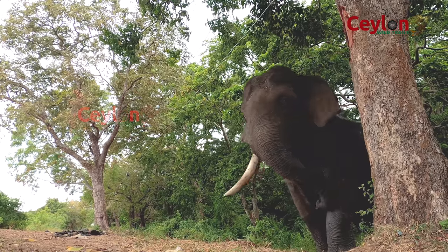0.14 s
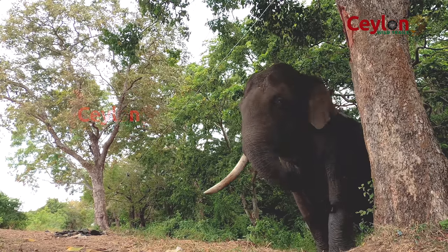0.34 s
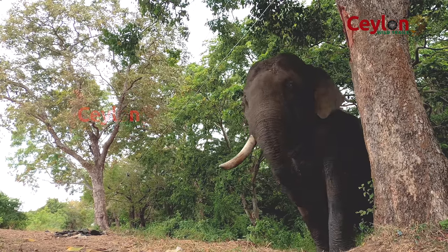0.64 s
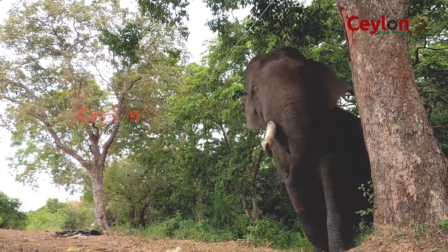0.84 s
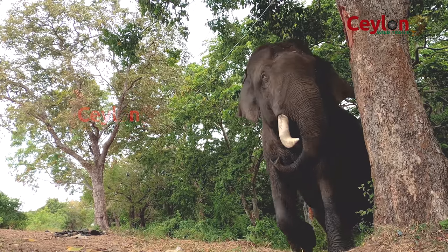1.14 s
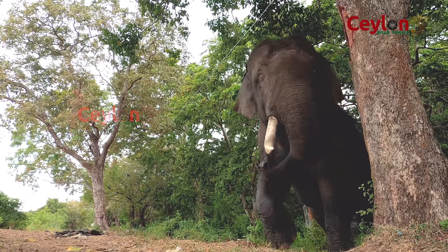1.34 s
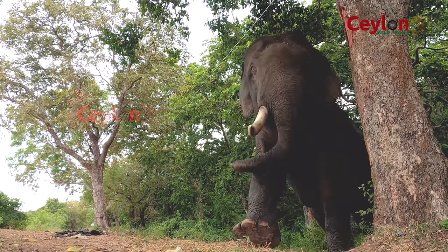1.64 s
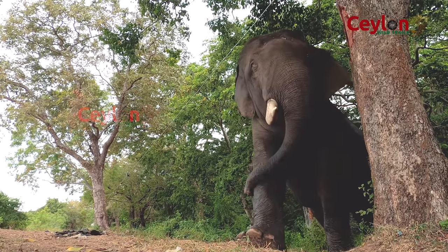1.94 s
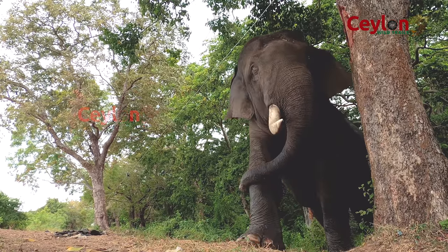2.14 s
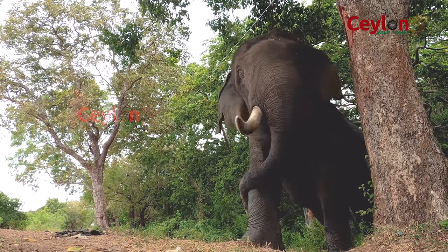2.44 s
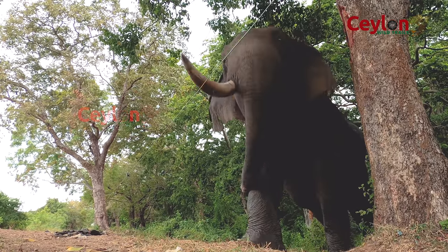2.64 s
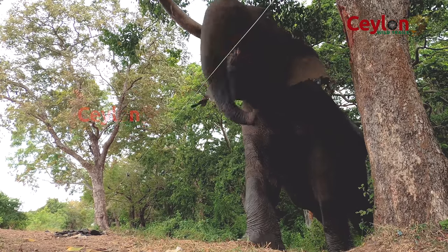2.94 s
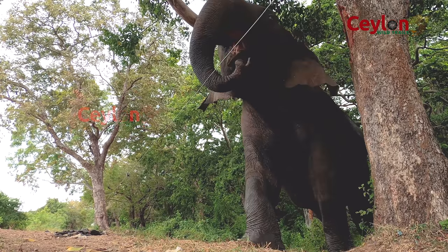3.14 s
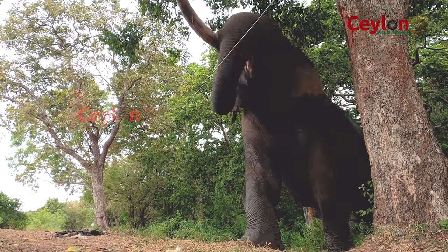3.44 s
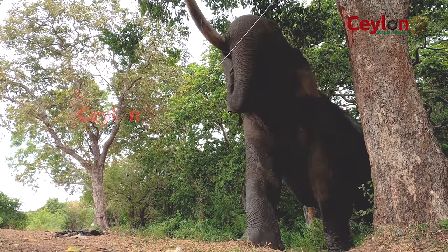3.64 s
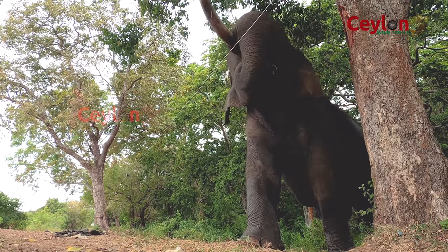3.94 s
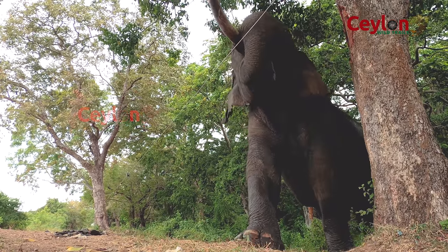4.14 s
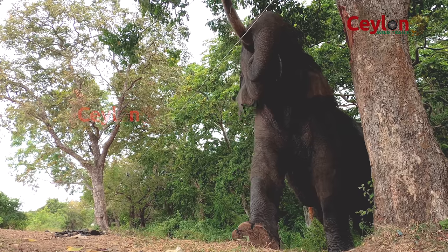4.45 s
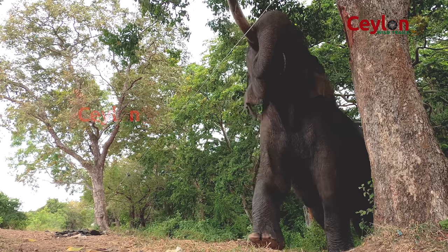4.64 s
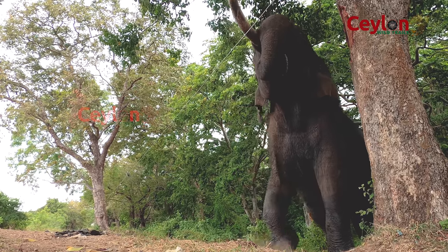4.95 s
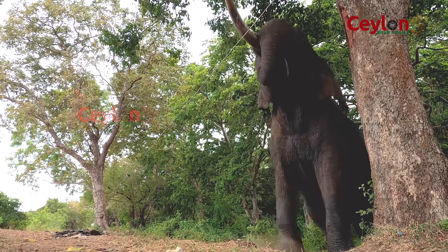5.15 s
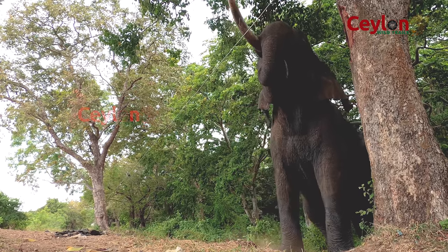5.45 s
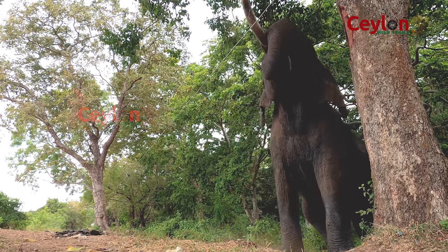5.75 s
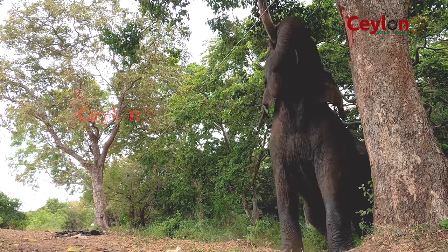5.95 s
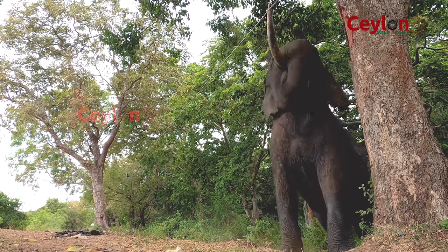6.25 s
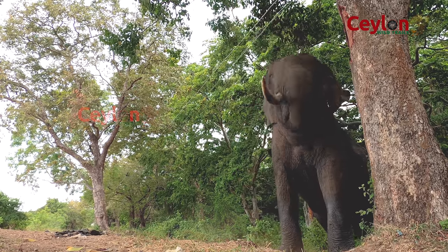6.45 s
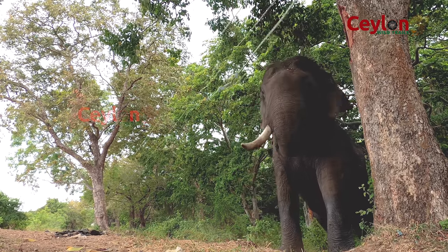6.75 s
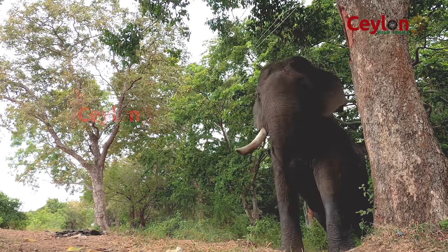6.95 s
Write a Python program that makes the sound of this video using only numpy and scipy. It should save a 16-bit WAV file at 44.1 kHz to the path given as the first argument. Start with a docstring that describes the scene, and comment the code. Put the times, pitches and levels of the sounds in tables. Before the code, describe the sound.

Faint bird chirps, a quick trill and three short whistles sound among trees over low gusts on the microphone. Nearby, an elephant's steel chain clanks in two short bursts and drags softly. The animal's feet crush dry soil and leaves, with dull snaps and a thud. The chain then breaks into hard, bright jingling, the loudest sound, lasting to the end. The outdoor sound comes from the left side only.

```python
"""Chained elephant at a forest edge.

An elephant shifts its feet and stretches up into a tree, crushing dry soil, clods and leaves.
A steel chain, probably on its leg, clinks, drags, then jingles hard as its links collide, ring and scrape.
Birds trill and whistle among the trees. Air rumbles on a microphone that feeds the left channel only."""
import sys
import numpy as np
from scipy import signal
from scipy.io import wavfile
from scipy.ndimage import uniform_filter1d

SR = 44100
rng = np.random.default_rng(int(sys.argv[2]) if len(sys.argv) > 2 else 0)


def put_to_file(sound):
    """Save the sound as 16-bit audio at rate SR, in the file named by the first command-line argument."""
    columns = np.atleast_2d(sound).T  # one column per channel
    safe = np.clip(columns, -1, 1)
    whole_steps = np.round(safe * 32767)
    wavfile.write(sys.argv[1], SR, whole_steps.astype(np.int16))


N = 313551
TIME_S = np.arange(N) / SR
CONTACT_S = 0.0007  # time constant of a link's attack

# Spectra of forest air, microphone rumble and a strong buffet's upper part.
# Each row: frequency in Hz, relative gain in dB.
AIR_SPECTRUM = [(59, -30.5), (100, -14), (128, -4), (299, -10), (684, -24.5), (1030, -24.5), (2370, -26.5),
                (3970, -24.5), (8000, -39.5), (9800, -37), (10900, -72)]
RUMBLE_SPECTRUM = [(10, -13.5), (25, -1), (42, 0), (70, 2.5), (95, -6), (125, -22), (170, -38), (300, -41),
                   (800, -78)]
GUST_SPECTRUM = [(50, -44), (100, 18.5), (135, 4), (190, -15), (600, -87)]
# Forest air, and the breeze between buffets. Each row: time in seconds, level in dB.
AIR_LEVELS = [(0, -56), (2.6, -57), (3.5, -55), (4.27, -58), (4.6, -49), (5.0, -56), (5.8, -53.5),
              (6.3, -58.5)]
BREEZE_LEVELS = [(0, -43), (1.4, -52), (3.7, -48.5), (5.4, -55), (6.2, -62.5), (7.1, -60)]
# Air hitting the microphone. Each row: peak time and half length in seconds, level in dB.
MIC_BUFFETS = [(0.64, 0.12, -34), (0.85, 0.074, -33), (1.146, 0.15, -29.5), (1.642, 0.12, -34),
               (1.936, 0.063, -33.5), (2.1, 0.073, -38), (2.472, 0.16, -36), (3.143, 0.024, -36),
               (3.604, 0.066, -38.5), (4.846, 0.044, -40.5), (5.002, 0.066, -44), (6.034, 0.012, -32.5),
               (6.92, 0.12, -45)]
# Distant birds. Each row: start and length in seconds, level in dB, start and end pitch in Hz.
FAR_CHIRPS = [(0.332, .07, -50, 3900, 5470), (0.388, 0.076, -49.5, 5310, 3960),
              (0.445, 0.093, -50, 2910, 3640), (0.773, 0.044, -48, 2780, 3860),
              (0.822, 0.071, -47, 4270, 5480), (3.634, 0.048, -49, 3750, 3130),
              (3.905, 0.061, -47.5, 4000, 3090), (4.044, 0.046, -42.5, 4450, 4980),
              (4.209, 0.12, -47.5, 3870, 2620), (4.824, 0.084, -49, 3920, 3100),
              (5.552, 0.084, -46, 3420, 4400), (5.694, 0.066, -46, 3250, 4280),
              (5.833, 0.071, -44.5, 3450, 4270)]
# Three whistles, each lower than the last.
# Each row: start and length in seconds, level in dB, start, middle and end pitch in Hz.
BIRD_WHISTLES = [(2.152, 0.072, -35, 2550, 2666, 2815), (2.294, 0.083, -39.5, 2440, 2326, 2450),
                 (2.475, 0.063, -35.5, 2100, 2183, 2100)]
# Runs of a trill. Each row: first and last onset in seconds, notes per second, first and last level in dB,
# top pitch in Hz.
TRILL_RUNS = [(1.541, 1.678, 35, -43.5, -36, 3380), (1.725, 1.875, 20, -35.5, -35, 3260),
              (1.972, 2.024, 20, -34.5, -33.5, 3250)]
# Feet on soil. Each row: peak time, rise and fall in seconds, level in dB, band centre in Hz.
SOIL_SCUFFS = [(0.1, .05, 0.12, -61.5, 895), (0.42, 0.038, 0.085, -56.5, 745),
               (0.57, .035, 0.069, -56, 650), (1.77, 0.062, 0.036, -61.5, 540),
               (1.935, 0.024, 0.018, -40, 784), (2.024, 0.0088, 0.022, -51, 940),
               (2.84, 0.065, 0.19, -55.5, 1700), (3.371, 0.0059, 0.036, -53.5, 1550),
               (3.713, 0.011, 0.014, -54, 1990), (4.551, 0.1, 0.039, -46, 950),
               (4.595, 0.045, 0.073, -36.5, 570), (4.685, 0.035, 0.017, -34, 650),
               (4.718, .025, 0.032, -34, 470), (4.715, .05, 0.025, -38.5, 194),
               (4.796, 0.0034, 0.005, -35, 590), (5.184, 0.004, 0.084, -41.5, 2070),
               (5.19, 0.0087, 0.053, -40, 705), (5.2, 0.012, 0.046, -35.5, 216)]
# Dry leaves. Each row: peak time and rise in seconds, level in dB.
LEAF_RUSTLES = [(1.731, 0.072, -49), (2.03, 0.064, -52), (2.47, 0.1, -52.5), (2.69, 0.022, -53),
                (2.826, 0.041, -43.5), (3.054, .012, -45), (4.57, 0.058, -60), (5.935, 0.021, -48)]
# Breaking clods. Each row: time in seconds, peak level in dB, pitch in Hz.
CLOD_CRACKS = [(4.521, -35, 1010), (4.573, -20, 1040), (4.582, -17.5, 1010), (4.615, -20, 1070),
               (4.684, -29, 1360), (4.698, -26, 850), (4.7142, -23.5, 633), (4.794, -27.5, 830),
               (6.183, -37, 584)]
# Heavy steps. Each row: peak time in seconds, level in dB.
FOOT_THUDS = [(5.2, -37), (6.039, -36)]
# Modes of a typical link. Each row: frequency in Hz, relative level in dB, nominal T60 in seconds.
LINK_MODES = [(3250, -14, 0.02), (4720, -3, 0.053), (4818, 5.5, 0.03), (5084, 4, 0.19), (5262, 4.5, 0.14),
              (5560, -1, 0.11), (5960, -2, 0.056), (6160, -4, 0.12), (6370, -7.5, 0.088), (7080, -14, 0.17),
              (7550, -13, 0.12), (8720, -12, 0.12), (9400, -43, 0.029), (11800, -23, .05)]
# Steel scraping steel. Each row: frequency in Hz, relative gain in dB.
SCRAPE_SPECTRUM = [(200, 5.5), (800, -9.5), (1300, 2.5), (2400, 4.5), (3500, 7.5), (6000, 8.5), (9000, 6.5),
                   (10300, 0), (12400, -3), (15000, -15)]
# Strong overtones ringing on from the first two chain clanks.
# Each row: start in seconds, level in dB, pitch in Hz, T60 in seconds.
CLANK_OVERTONES = [(2.862, -47, 3100, 0.23), (2.862, -30, 7950, 0.082), (2.864, -22.5, 4630, 0.07),
                   (2.867, -28.5, 5980, 0.12), (3.126, -26, 6520, .07), (3.126, -39, 7560, 0.29),
                   (3.129, -35, 5010, 0.25)]
# Hard knocks. Each row: start in seconds, peak level in dB, tick-to-ring ratio in dB, main partial in Hz.
CHAIN_CLINKS = [(2.861, -19.5, 0, 5090), (2.868, -19.5, -4.5, 5103), (2.875, -25.5, 3, 5222),
                (3.052, -20.5, -2.5, 4440), (3.074, -24, 15, 5760), (3.085, -18.5, -8, 5060),
                (3.127, -18.5, -11, 4940), (3.157, -26, -11, 5060), (3.349, -37.5, 11, 5130),
                (5.9897, -10, -3.5, 5190), (5.999, -8.5, -15, 4810), (6.0445, -11, -17, 4920),
                (6.0537, -14.5, -6, 5000), (6.069, -22, -20, 4900), (6.119, -18.5, -14, 5130),
                (6.1389, -15, -5.5, 4855), (6.2125, -14.5, -28, 5170), (6.248, -17, -14, 5080),
                (6.2906, -19.5, -1, 5120), (6.366, -17, -14, 5140), (6.3949, -16.5, -10, 5150),
                (6.405, -19, -16, 5250), (6.463, -22.5, 5, 5380), (6.543, -17, -10, 5220),
                (6.602, -22, -1, 5320), (6.642, -22, -10, 5090), (6.77, -18.5, -5, 5160),
                (6.824, -16.5, -6, 6450), (6.907, -26, 6, 4830), (6.925, -17.5, 2, 5020),
                (6.961, -19, 6.5, 5280), (7.0843, -16, -8, 4790)]
# Chain settling, then dragging. Each row: time in seconds, relative ring and scrape levels in dB.
DRAG_LEVELS = [(2.87, -36, -50.5), (3.034, -46.5, -63), (3.055, -26.5, -44), (3.16, -35.5, -50),
               (3.23, -46, -58.5), (4.25, -55.5, -63), (5.971, -49, -65.5)]
# Sways of the trailing chain. Each row: peak time and half length in seconds, ring level in dB.
CHAIN_SWAYS = [(3.32, 0.049, -53), (3.485, 0.088, -57), (3.92, 0.034, -53), (4.715, 0.038, -54),
               (5.68, 0.098, -59.5)]
# Jerks. Each row: peak time and half length in seconds, relative ring and scrape levels in dB.
CHAIN_JERKS = [(6.067, 0.062, -28, -45), (6.16, 0.12, -31.5, -46), (6.392, 0.078, -27, -45.5),
               (6.556, 0.034, -26.5, -42), (6.613, 0.039, -28, -44), (6.709, 0.041, -26.5, -54),
               (6.769, 0.031, -25.5, -40), (6.824, 0.065, -30, -38), (6.929, 0.021, -23, -38.5),
               (6.993, 0.046, -28, -42.5), (7.102, 0.043, -24.5, -42.5)]


def amp(db):
    """Decibels to gain."""
    return 10 ** (np.asarray(db) / 20)


def unit_rms(x):
    """Scales to rms 1."""
    return x / np.sqrt(np.mean(x ** 2) + 1e-20)


def unit_peak(x):
    """Scales to peak 1."""
    return x / (abs(x).max() + 1e-20)


def steady(x, span_s):
    """Evens out the level, keeping flutter faster than span_s."""
    size = max(int(span_s * SR), 8)
    power = uniform_filter1d(uniform_filter1d(x ** 2, size), size)
    return x / np.sqrt(abs(power) + 1e-12)


def low_pass(x, hz, order):
    """Cuts above hz."""
    return signal.sosfilt(signal.butter(order, hz, fs=SR, output="sos"), x)


def high_pass(x, hz, order):
    """Cuts below hz."""
    return signal.sosfilt(signal.butter(order, hz, "high", fs=SR, output="sos"), x)


def colour(x, spectrum):
    """Minimum-phase filter through (Hz, dB) points."""
    hz, db = np.transpose(spectrum)
    grid_hz = abs(np.fft.fftfreq(8192, 1 / SR))
    log_gain = np.log(amp(np.interp(np.log(grid_hz + 1), np.log(hz), db)))
    taps = np.fft.ifft(np.exp(np.conj(signal.hilbert(log_gain)))).real
    return signal.oaconvolve(x, taps[:len(grid_hz) // 2])[:len(x)]


def flutter(n, per_s):
    """Smooth random curve of rms 1."""
    return unit_rms(signal.resample(rng.standard_normal(int(n * per_s / SR) + 2), n))


def grains(n, per_s, spread_db):
    """Random impacts of either sign, sizes scattered by spread_db."""
    size = amp(spread_db * np.minimum(rng.exponential(1, n), 4))
    return size * rng.choice([-1., 1.], n) * (rng.random(n) < per_s / SR)


def swells(t, rows, bed_db):
    """Gain of bell-shaped swells, added in power to a bed."""
    power = sum((amp(db) * np.exp(-((t - peak_s) / half_s) ** 2)) ** 2 for peak_s, half_s, db in rows)
    return np.sqrt(amp(bed_db) ** 2 + power)


def add(mix, start_s, sound):
    """Mixes a sound in at start_s."""
    part = mix[max(round(start_s * SR), 0):][:len(sound)]
    part += sound[:len(part)]


def play(source, rows):
    """Mixes one (start, sound) from source per row."""
    mix = np.zeros(N)
    for row in rows:
        add(mix, *source(*row))
    return mix


def forest_air():
    """Faint, wavering wash of still air."""
    level_db = np.interp(TIME_S, *np.transpose(AIR_LEVELS)) + flutter(N, per_s=15)
    return amp(level_db) * unit_rms(colour(rng.standard_normal(N), AIR_SPECTRUM))


def mic_wind(gust_db=-6):
    """Air buffets the microphone; stronger buffets reach higher in frequency."""
    force = swells(TIME_S, MIC_BUFFETS, np.interp(TIME_S, *np.transpose(BREEZE_LEVELS)))
    rumble = steady(colour(rng.standard_normal(N), RUMBLE_SPECTRUM), span_s=0.035)
    gust = steady(colour(rng.standard_normal(N), GUST_SPECTRUM), span_s=0.063)
    return force * (rumble + amp(gust_db) * (force / force.max()) ** 1.95 * gust)


def forest_echo(x, t60_s):
    """Trunks and leaves scatter a thin tail of echoes."""
    t = TIME_S[:SR]
    tail = grains(SR, per_s=2500, spread_db=2) * amp(-60 * t / t60_s) * (t > 0.006)
    return signal.oaconvolve(x, tail / np.linalg.norm(tail))[:N]


def jitter(n):
    """Fast pitch noise of rms 1, heard as rasp."""
    return unit_rms(uniform_filter1d(rng.standard_normal(n), 24))


def chirp(start_s, length_s, db, start_hz, end_hz):
    """A distant bird's husky, straight slur."""
    return whistle(start_s, length_s, db, start_hz, (start_hz + end_hz) / 2, end_hz, skew=1, rasp=0.052)


def whistle(start_s, length_s, db, start_hz, middle_hz, end_hz, skew=1.5, rasp=0.0031):
    """A bird glides through three pitches; skew above 1 delays the swell."""
    u = np.linspace(0, 1, int(length_s * SR))
    glide_hz = np.polyval(np.polyfit([0, 0.5, 1], [start_hz, middle_hz, end_hz], 2), u)
    hz = glide_hz * (1 + rasp * jitter(len(u)))
    return start_s, amp(db) * np.sin(np.pi * u ** skew) * np.sin(2 * np.pi * np.cumsum(hz) / SR)


def trill_note(start_s, db, top_hz, length_s=0.028):
    """A raspy flick up, a weak top, a stronger slur down."""
    u = np.linspace(0, 1, int(length_s * SR))
    rasp = np.interp(start_s, [1.6, 1.85], [0.115, 0.04])  # clears as the trill slows
    arch = 1 - 0.179 * ((u - 0.42) / 0.57) ** 2
    hz = top_hz * (arch + rasp * jitter(len(u)))
    dip = 1 - 0.85 * np.exp(-((u - 0.38) / 0.24) ** 2)
    envelope = abs(np.sin(np.pi * u)) ** 0.5 * dip
    return start_s, amp(db) * envelope * np.sin(2 * np.pi * np.cumsum(hz) / SR)


def bird_trill(throat_hz=2860):
    """Runs of evenly spaced, growing notes; the throat passes little below throat_hz."""
    notes = []
    for first_s, last_s, per_s, first_db, last_db, top_hz in TRILL_RUNS:
        for u in np.linspace(0, 1, round((last_s - first_s) * per_s) + 1):
            notes.append((first_s + u * (last_s - first_s), first_db + u * (last_db - first_db), top_hz))
    return high_pass(play(trill_note, notes), throat_hz, order=8)


def crush(peak_s, rise_s, fall_s, db, low_hz, high_hz, per_s=3500, order=5):
    """Grains of soil or leaf break in clumps underfoot."""
    t = np.arange(-2 * rise_s, 3 * fall_s, 1 / SR)
    crunch = high_pass(grains(len(t), per_s, spread_db=0), low_hz, order=2)
    crunch = steady(low_pass(crunch, high_hz, order), span_s=0.28)
    stroke = np.exp(-abs(t / np.where(t < 0, rise_s, fall_s)) ** 1.12)
    clumps = amp(1.6 * flutter(len(t), per_s=150))
    return peak_s + t[0], amp(db) * stroke * clumps * crunch


def scuff(peak_s, rise_s, fall_s, db, centre_hz):
    """A foot slides over soil: a coarse crunch about two octaves wide."""
    return crush(peak_s, rise_s, fall_s, db, centre_hz / 2.13, centre_hz * 2.13, per_s=1100, order=4)


def rustle(peak_s, rise_s, db):
    """Dry leaves are pressed down and settle."""
    return crush(peak_s, rise_s, fall_s=0.11, db=db, low_hz=1930, high_hz=5960)


def crack(at_s, db, hz, width_cycles=0.53):
    """A clod breaks with a short, dull snap."""
    cycles = hz * np.arange(SR // 50) / SR
    envelope = cycles ** 2 * np.exp(-2 * cycles / width_cycles)
    return at_s - 1 / hz, amp(db) * unit_peak(envelope * np.sin(2 * np.pi * cycles))


def thud(peak_s, db):
    """The ground gives under a heavy foot."""
    return crush(peak_s, rise_s=0.00577, fall_s=0.037, db=db, low_hz=77.6, high_hz=149)


def link_tone(start_s, db, hz, t60_s):
    """One link mode builds during contact, then decays."""
    t = TIME_S[:SR // 2]
    envelope = amp(db - 60 * t / t60_s) * (1 - np.exp(-t / CONTACT_S))
    return start_s, envelope * np.sin(2 * np.pi * hz * t)


def link_ring(hits, damping, uneven_db=5.5, main_hz=5100):
    """Impacts ring one link with random mode levels and tuning, most detuned far from main_hz."""
    hz, db, t60_s = np.transpose(LINK_MODES)[:, :, None]
    offset, emphasis, phase = rng.standard_normal((3, len(LINK_MODES), 1))
    t = TIME_S[:SR // 5]
    detune = (0.011 + 0.025 * abs(np.log(hz / main_hz))) * offset
    envelopes = amp(db + uneven_db * emphasis - 60 * t * damping / t60_s)
    modes = envelopes * np.sin(2 * np.pi * (hz * (1 + detune) * t + phase))
    ring = modes.sum(0) * (1 - np.exp(-t / CONTACT_S))
    return signal.oaconvolve(hits, unit_rms(ring))[:len(hits)]


def clink(start_s, db, tick_db, partial_hz, bounce_s=0.003):
    """One hard knock: gritty tick, chatter of bounces, ring of the struck link."""
    t = TIME_S[:SR // 2]
    hits = 0.25 * grains(len(t), per_s=700, spread_db=1) * np.exp(-t / bounce_s)
    hits[0] = 1
    _, partial = link_tone(start_s, db=-3, hz=partial_hz, t60_s=0.088)
    ring = unit_peak(unit_peak(link_ring(hits, damping=1)) + partial)
    burst = rng.standard_normal(len(t)) * np.exp(-t / 0.004)
    tick = unit_peak(low_pass(colour(burst, SCRAPE_SPECTRUM), 13400, order=20))
    return start_s, amp(db) * unit_peak(ring + amp(tick_db) * tick)


def rattle(ring_gain, scrape_gain, top_hz, hits_per_s, damping, links=20, slide_s=0.0028, even_s=0.054):
    """Links tumble over each other; each impact rings and slides on briefly."""
    n = len(ring_gain)
    hits = [grains(n, hits_per_s, spread_db=3) for _ in range(links)]
    ring = steady(sum(link_ring(link_hits, damping) for link_hits in hits), even_s)
    contact = signal.lfilter([1], [1, -np.exp(-1 / (slide_s * SR))], abs(sum(hits)))
    grit = colour((2.2 + unit_rms(contact)) * rng.standard_normal(n), SCRAPE_SPECTRUM)
    scrape = steady(low_pass(grit, top_hz, order=20), even_s)
    flicker = amp(1.2 * flutter(n, per_s=22))
    return ring_gain * flicker * ring + scrape_gain * scrape


def chain_drag():
    """The chain settles, trails over the ground and tinkles at each sway."""
    times_s, ring_db, scrape_db = np.transpose(DRAG_LEVELS)
    t = np.arange(times_s[0], times_s[-1], 1 / SR)
    ring_gain = swells(t, CHAIN_SWAYS, np.interp(t, times_s, ring_db) - 6.5)
    sway_scrapes = [(peak_s, half_s, db - 7) for peak_s, half_s, db in CHAIN_SWAYS]
    scrape_gain = swells(t, sway_scrapes, np.interp(t, times_s, scrape_db) + 3)
    return t[0], rattle(ring_gain, scrape_gain, top_hz=10400, hits_per_s=12, damping=0.6)


def chain_shake(start_s=6.0, brighten_s=(6.44, 6.95), bright_hz=8050):
    """Jerks send surges through the swinging chain; the jingle grows brighter toward the end."""
    t = TIME_S[TIME_S >= start_s]
    peak_s, half_s, ring_db, scrape_db = np.transpose(CHAIN_JERKS)
    ring_gain = swells(t, zip(peak_s, half_s, ring_db - 1), bed_db=-43)
    scrape_gain = swells(t, zip(peak_s, half_s, scrape_db + 3), bed_db=-43.5)
    jingle = rattle(ring_gain, scrape_gain, top_hz=12700, hits_per_s=13, damping=1.2)
    return t[0], jingle + np.interp(t, brighten_s, [0, 1]) * high_pass(jingle, bright_hz, order=2)


def scene():
    """Chain and feet close by, birds further off among the trees."""
    chain = play(clink, CHAIN_CLINKS) + play(link_tone, CLANK_OVERTONES)
    add(chain, *chain_drag())
    add(chain, *chain_shake())
    feet = play(scuff, SOIL_SCUFFS) + play(rustle, LEAF_RUSTLES)
    feet += play(crack, CLOD_CRACKS) + play(thud, FOOT_THUDS)
    whistles, chirps, trill = play(whistle, BIRD_WHISTLES), play(chirp, FAR_CHIRPS), bird_trill()
    mono = chain + amp(-16) * forest_echo(chain, t60_s=0.5)
    mono += feet + amp(-22) * forest_echo(feet, t60_s=0.5)
    mono += whistles + amp(-5.5) * forest_echo(whistles, t60_s=0.39)
    mono += trill + amp(-4.5) * forest_echo(trill, t60_s=0.34)
    mono += 0.32 * chirps + 0.42 * forest_echo(chirps, t60_s=0.36)
    mono += mic_wind() + forest_air()
    return np.array([mono, mono])


def record(dry, gain_db=6, ceiling=0.85, edge_hz=14600):
    """Left channel only, clipped at the ceiling, then steeply band-limited."""
    channel_gains = np.array([[1], [1e-5]])
    clipped = np.clip(amp(gain_db) * dry * channel_gains, -ceiling, ceiling)
    taps = signal.firwin(511, edge_hz, window=("kaiser", 9), fs=SR)
    return signal.oaconvolve(clipped, taps[None], "same")


dry = scene()
out = record(dry)
put_to_file(out)
```